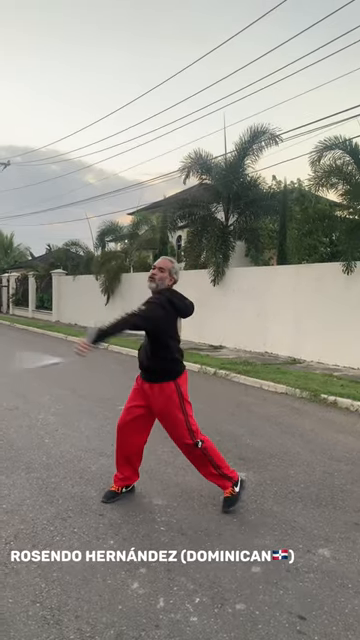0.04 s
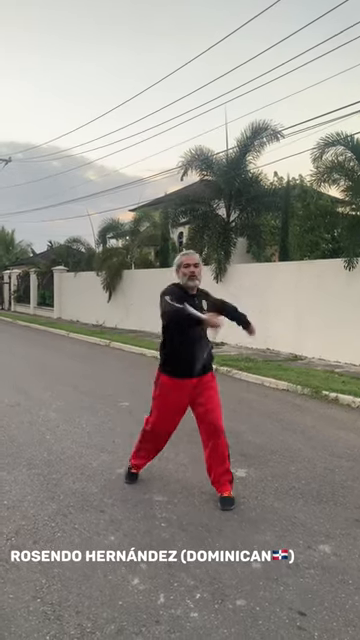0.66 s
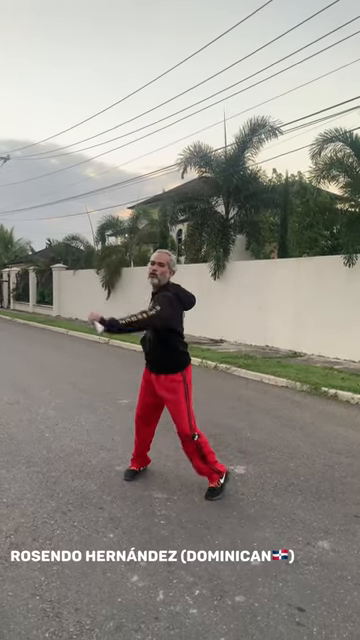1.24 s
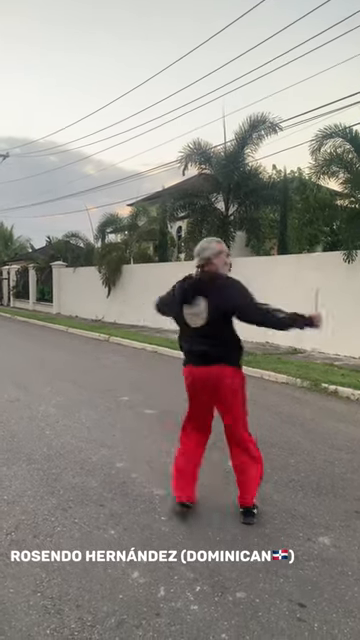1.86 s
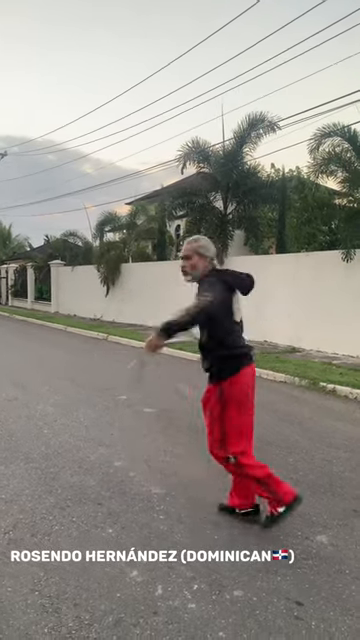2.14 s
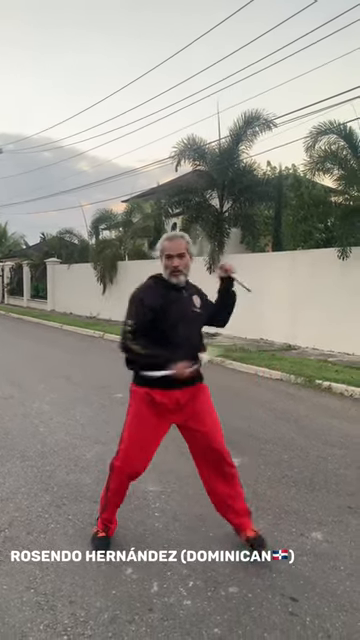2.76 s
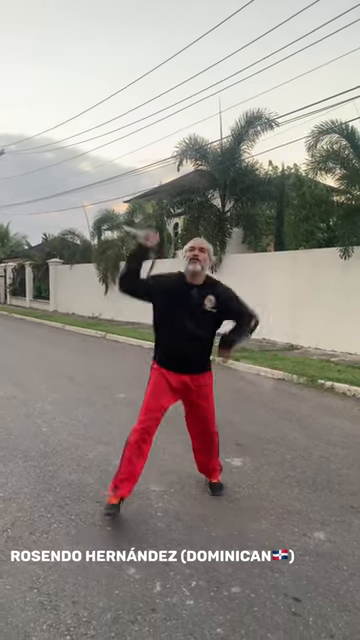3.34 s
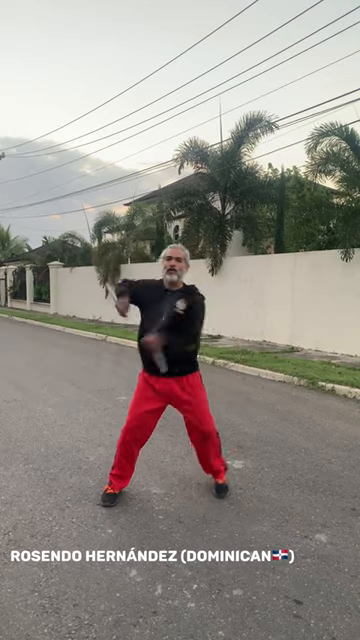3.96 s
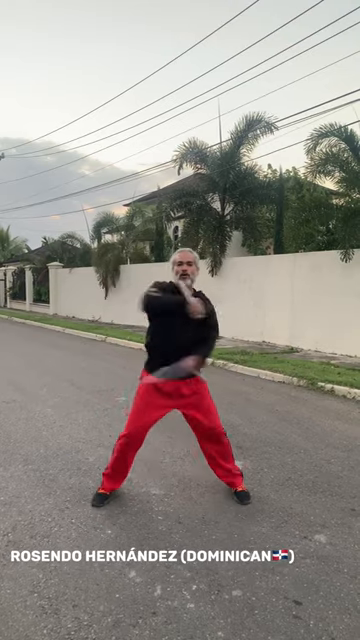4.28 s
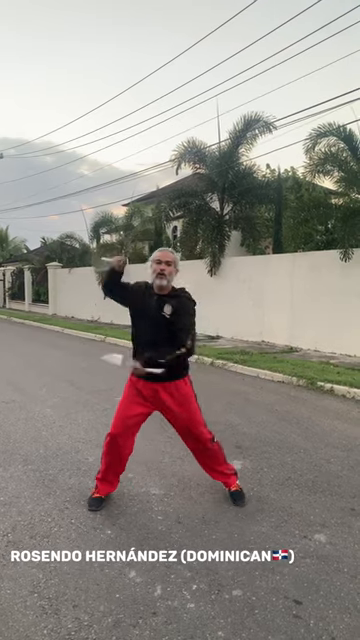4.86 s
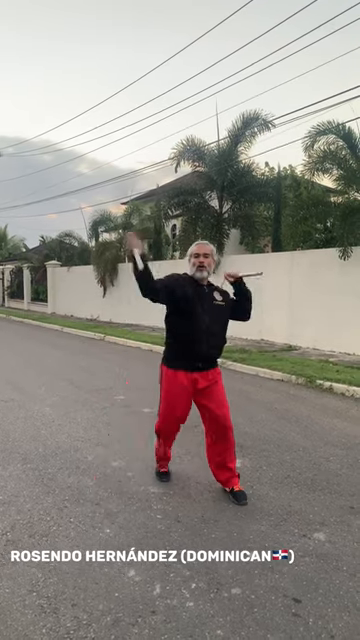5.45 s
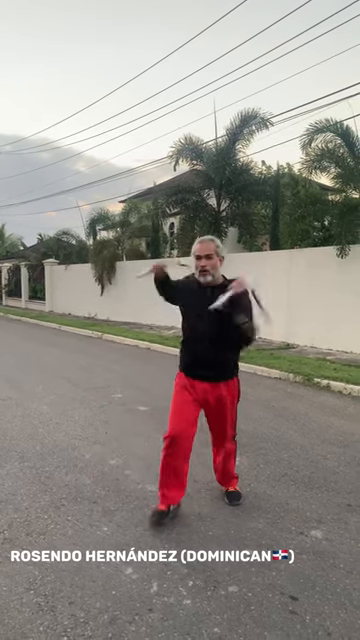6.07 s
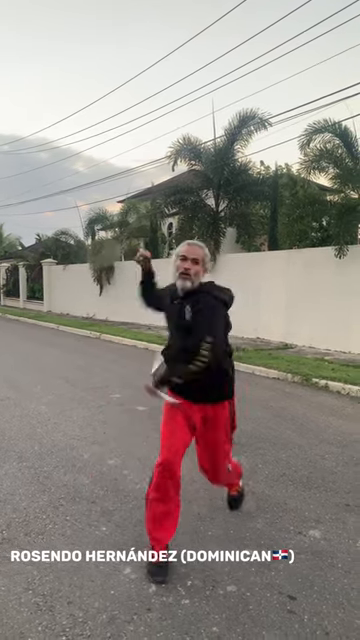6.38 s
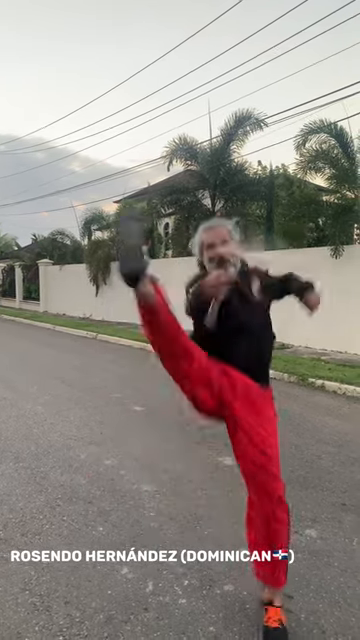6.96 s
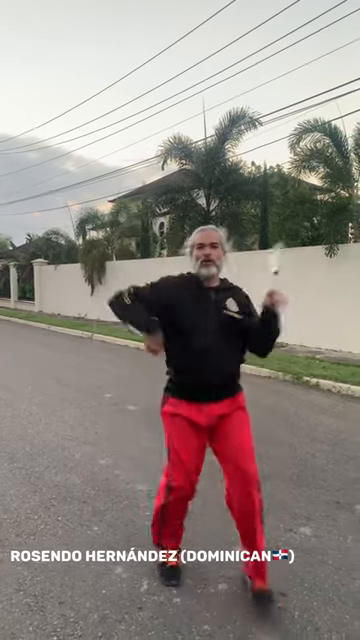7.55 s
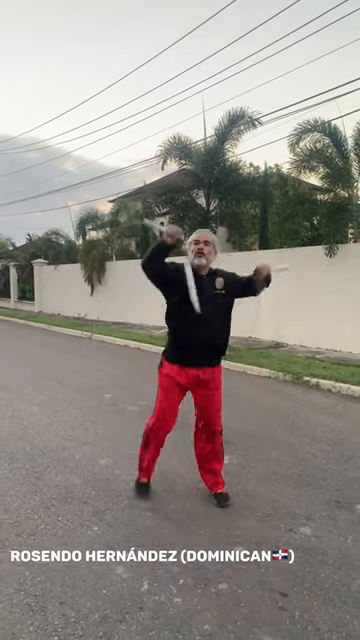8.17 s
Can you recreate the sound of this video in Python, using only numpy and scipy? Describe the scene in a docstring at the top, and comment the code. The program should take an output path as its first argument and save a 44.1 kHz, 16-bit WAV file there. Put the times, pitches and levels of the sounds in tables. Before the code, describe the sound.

Two whirled chained sticks rattle, clink and knock hollowly on a quiet street, with one sharp kick thump near the end.

```python
"""Bright clinks, chain chatter and hollow knocks: two chained sticks whirled on a quiet street.
The loose links rattle with every swing and bunch into a clink when a stick is caught or turned;
taps set the hollow sticks ringing. The moves push soft gusts of air, and a high kick snaps a trouser
leg taut with a crack and a thump. Far off, the town rumbles under a few faint hoots."""
import sys
import numpy as np
from scipy import signal
from scipy.fft import rfft, irfft, next_fast_len
from scipy.io import wavfile

SR = 44100
rng = np.random.default_rng(int(sys.argv[2]) if len(sys.argv) > 2 else 0)


def generate_wav(signal):
    """Clip the signal to [-1, 1] and save it as 16-bit WAV at the path in sys.argv[1]."""
    frames = np.transpose(np.atleast_2d(signal))
    scaled = np.clip(frames, -1, 1) * 32767
    pcm = np.round(scaled).astype(np.int16)
    wavfile.write(sys.argv[1], SR, pcm)


N = 362502
TIME = np.arange(N) / SR

# a stick is caught or turned and the chain jerks taut:
# (time [s], length [s], link clatter [dB], high link ring [dB], stick knock [dB])
CHAIN_JERKS = [(0.166, 0.041, -23.5, -41, -61), (0.259, 0.017, -20, -24, -59),
               (0.391, 0.043, -22, -22, -40), (0.434, 0.0057, -20, -23, -36.5),
               (0.502, 0.012, -22, -32, -39), (0.768, 0.026, -24, -26, -46),
               (0.894, 0.037, -23.5, -44, -49), (0.973, 0.014, -23, -35, -62),
               (1.016, 0.0092, -27.5, -36, -58), (1.194, 0.012, -22, -37, -39),
               (1.312, 0.0049, -19.5, -37, -46), (1.353, 0.039, -16, -31, -31),
               (1.3916, 0.01, -22.0, -25, -44), (1.432, 0.0096, -27, -17, -54),
               (1.464, 0.058, -27.0, -31, -41), (1.555, 0.023, -22, -20, -50),
               (1.6146, 0.018, -25, -35, -51), (1.689, 0.053, -21.5, -25, -56),
               (1.96, 0.03, -19.5, -28.0, -36), (2.021, 0.0083, -22, -25.0, -38),
               (2.144, 0.013, -24.5, -22, -46), (2.328, 0.023, -25, -29, -34.5),
               (2.469, 0.01, -34, -20, -55), (2.705, 0.034, -25, -35, -41), (2.772, 0.07, -24.5, -28, -36),
               (2.867, 0.032, -19, -19, -35), (2.9154, 0.018, -20.5, -28, -35),
               (3.131, 0.031, -20, -37, -45), (3.311, 0.033, -20.5, -22, -44),
               (3.377, 0.029, -21.5, -16.5, -38.5), (3.559, 0.008, -23.5, -38, -31.5),
               (3.593, 0.01, -30, -25, -56), (3.929, 0.019, -25.5, -32, -41),
               (4.304, 0.021, -24.5, -42, -36.5), (4.636, 0.0059, -25, -32.0, -53),
               (4.669, 0.015, -18.5, -30, -29), (4.718, 0.023, -20.5, -25, -39),
               (4.896, 0.017, -25.5, -25, -35), (4.953, 0.0098, -22, -24, -40),
               (4.9763, 0.01, -21, -32, -35), (5.056, 0.017, -24.5, -26, -48),
               (5.098, 0.017, -27, -29, -38.5), (5.32, 0.068, -17.5, -36, -38),
               (5.665, 0.014, -19.5, -35, -36), (5.694, 0.044, -23, -31.0, -45),
               (5.779, 0.022, -22.5, -24, -30.5), (5.981, 0.052, -30, -23, -39),
               (6.079, 0.032, -26, -29, -34.5), (6.167, 0.039, -23.5, -17, -36),
               (6.269, 0.047, -25, -33, -31.5), (6.3446, 0.019, -22.5, -41, -31),
               (6.390, 0.012, -17.5, -16, -34), (6.478, 0.029, -21.5, -32, -31),
               (6.525, 0.017, -23.5, -28, -50), (6.594, 0.012, -22, -39, -40),
               (6.685, 0.04, -26, -16, -33.5), (6.7237, 0.011, -18, -28, -37),
               (6.747, 0.016, -19, -23, -37), (6.788, 0.018, -30, -19, -53), (6.9924, 0.022, -17, -24, -32),
               (7.057, 0.012, -17.5, -26, -26.5), (7.1983, 0.028, -28.5, -13.5, -54),
               (7.458, 0.036, -28, -22, -38), (7.64, 0.012, -27.5, -23, -43),
               (7.679, 0.011, -32, -15.5, -48), (7.761, 0.05, -25.5, -23, -38.5),
               (7.79, 0.011, -27.5, -38, -36), (7.935, 0.01, -26, -23, -41.5),
               (8.008, 0.016, -24.5, -26.0, -36), (8.183, 0.033, -20, -15, -28.5)]
# two links hit each other squarely: (time [s], level [dB])
LINK_SNAPS = [(0.152, -24.5), (.503, -22), (.726, -30), (1.096, -31.5), (1.123, -27), (1.19, -22.5),
              (1.3141, -24.5), (1.391, -30), (1.558, -24.5), (1.9607, -26), (2.3442, -27.5), (2.413, -21),
              (2.5164, -29.5), (2.570, -27.5), (2.8416, -23), (2.862, -28.5), (2.8976, -31),
              (2.9165, -22.5), (2.972, -22.5), (3.1946, -22), (3.218, -25.5), (3.5469, -19), (3.5568, -23),
              (3.588, -20), (3.8047, -20.5), (4.046, -35), (4.1326, -19.5), (4.405, -28), (4.6677, -33),
              (5.312, -23.5), (5.3635, -20), (5.595, -26), (5.8564, -23), (6.144, -24.5), (6.2047, -19.5),
              (6.654, -24), (6.860, -24.5), (7.033, -24), (7.821, -24), (8.182, -20)]
# tone of clattering links, their high ring, a hard snap and a knocked stick: (frequency [Hz], level [dB])
CLATTER_TONE = [(2500, -37), (3800, -14), (5300, 3), (6500, 0), (7400, -2.5), (8400, -1), (9600, 3.5),
                (10400, 3), (12400, -6.5), (16000, -9.5)]
RING_TONE = [(13000, -18), (14200, 14), (15200, 14), (16000, 20)]
SNAP_TONE = [(600, -16.5), (2200, -5), (3800, -5.5), (6500, 6.5), (11000, 6), (16000, 2.5)]
STICK_TONE = [(300, -23), (800, -8.5), (1400, -9.5), (2100, 1.5), (2500, -5), (3400, -3.5), (5000, -9.5)]

SWAY = .045  # share by which the lag between the channels varies as the chain whirls
TUBE_WIDTH_HZ = 90  # bandwidth of a stick's hollow note


def clinks(directions=5, knock_trim_db=-1):
    """Each jerk strikes links and sticks at a new spot, so every clink rings differently."""
    places = np.zeros((directions, N))
    for row, (s, length, clatter_db, ring_db, knock_db) in enumerate(CHAIN_JERKS):
        hits = jerk(length)
        clatter = contact(CLATTER_TONE, t60=.016, tick=.7, mode_count=30)
        ring = contact(RING_TONE, t60=.02, tick=.6, mode_count=8)
        knock = contact(STICK_TONE, t60=.026, tick=.6, mode_count=22)
        for response, db in (clatter, clatter_db), (ring, ring_db), (knock, knock_db + knock_trim_db):
            clink = signal.fftconvolve(hits, response)
            start = s - (len(hits) / 2 + len(response) // 16) / SR
            add(places[row % directions], start, hit_level(clink, db))
    return sum(stereo(x, skew) for x, skew in zip(places, np.linspace(-SWAY, SWAY, directions)))


def snaps(bounce_s=.0045):
    """Link meets link squarely: one hard, broadband blow amid a few quick bounces."""
    places = np.zeros((2, N))
    for row, (s, db) in enumerate(LINK_SNAPS):
        hits = jerk(bounce_s)
        hits[len(hits) // 2] = 1  # as much energy as all the bounces
        snap = strike(hits, contact(SNAP_TONE, t60=.009, tick=.8, mode_count=40))
        add(places[row % 2], s - len(hits) / 2 / SR, hit_level(snap, db))
    return stereo(places[0], -SWAY) + stereo(places[1], SWAY)


def hollow_notes(taps_s=.012):
    """Quick taps near the open end of a stick pile up in its hollow and ring out as a note."""
    # (time [s], pitch [Hz], level [dB])
    notes = [(.175, 2100, -39), (.774, 2050, -36), (.804, 2090, -38), (1.431, 2200, -35),
             (2.412, 2140, -36), (2.902, 2010, -30.5), (3.591, 2020, -33.5), (4.715, 2220, -30.5),
             (5.697, 2110, -36), (6.174, 2070, -36.5), (6.695, 2150, -38), (7.762, 1990, -35)]
    out = np.zeros(N)
    for s, hz, db in notes:
        ring = resonate(jerk(taps_s), hz, TUBE_WIDTH_HZ)
        add_centred(out, s, hit_level(resonate(ring, hz, hz / 2), db))
    return stereo(out)


def loose_links(directions=3, tube_hz=2090, detune=.025):
    """Each swing sets the chain shimmering; single links ping, tick and tap on the hollow sticks."""
    out = 0
    strength = shaking() / np.sqrt(directions)
    for place in np.linspace(-1, 1, directions):
        shimmer = unit(colour(chatter(rate=2500, scatter_db=5, clump_db=8), CLATTER_TONE))
        pings = tinkles(CLATTER_TONE, 5300, 11500, count=380, width_hz=300, scatter_db=10)
        sparkle = tinkles(RING_TONE, 14300, 15700, count=300, width_hz=450, scatter_db=10)
        ticks = tinkles(SNAP_TONE, 5500, 11500, count=50, width_hz=5000, scatter_db=6, length=.003)
        links = undb(-3) * shimmer + undb(-4) * pings + undb(-7) * ticks + undb(-4) * sparkle
        taps = strength * chatter(rate=300, scatter_db=4, clump_db=11, clump_hz=50)
        knocks = strike(taps, contact(STICK_TONE, t60=.02, tick=2, mode_count=40))
        # the hollow note rings on between the taps, a little different at each end
        tube = resonate(taps, tube_hz * (1 + detune * place), TUBE_WIDTH_HZ)
        tube *= np.sqrt(SR / np.pi / TUBE_WIDTH_HZ)  # make-up gain for the narrow band
        out += stereo(strength * links + undb(-18) * knocks + undb(-15) * tube, SWAY * place)
    return out


def shaking(rest_db=-42, settle_db=-16, settle_s=.05, slack_db=-6, slack_lead_s=.015, slack_s=.009):
    """Chatter envelope: the chain swells with a swing, flies slack before a hit, settles after a jerk."""
    # swings of the sticks at their fastest: (time [s], length [s], level [dB])
    swings = [(0.034, 0.16, -35), (0.59, 0.079, -39), (0.77, 0.13, -32.5), (1.096, 0.19, -39),
              (1.624, 0.11, -36), (2.014, 0.066, -30), (2.905, 0.021, -21), (3.09, 0.11, -30),
              (3.595, 0.083, -27.5), (3.813, 0.062, -29), (4.053, 0.1, -33.5), (4.348, 0.13, -34.5),
              (4.611, 0.047, -27), (4.955, 0.042, -24.5), (5.34, 0.14, -30), (5.633, 0.085, -28.5),
              (5.926, 0.12, -30.5), (6.256, 0.15, -28.5), (6.434, 0.055, -32), (6.694, 0.24, -30),
              (7.041, 0.036, -24), (7.236, 0.092, -38), (7.597, 0.11, -31.5), (8.15, 0.36, -33)]
    t = TIME[::64]
    power = undb(rest_db) ** 2
    for s, length, db in swings:
        power += undb(db) ** 2 * np.exp(-2 * ((t - s) / length) ** 2)
    for s, _, db, *_ in CHAIN_JERKS:
        power += (t > s) * undb(db + settle_db) ** 2 * np.exp(-2 * np.abs(t - s) / settle_s)
    slack = sum(np.exp(-((t - s + slack_lead_s) / slack_s) ** 2) for s, *_ in CHAIN_JERKS + LINK_SNAPS)
    return np.interp(TIME, t, np.sqrt(power) * undb(slack_db * np.minimum(slack, 1)))


def jerk(length, rate=2200, scatter_db=4, rise=.25, fall=.56, snap_s=.0026, size=1536):
    """The chain pulls taut: taps build to one snap and die away; the shorter, the harder the snap."""
    t = np.arange(-size, size + 1) / SR / length
    hits = random_taps(len(t), rate) * undb(scatter_db * rng.standard_normal(len(t)))
    hits *= np.exp(-np.abs(t) / np.where(t < 0, rise, fall))
    hits /= np.linalg.norm(hits) + 1e-9
    hits[size] = snap_s / length
    return hits


def chatter(rate, scatter_db, clump_db, clump_hz=75):
    """Loose links tap at random, in small clumps; rms 1."""
    hits = random_taps(N, rate)
    knots = np.arange(0, N / SR, 1 / clump_hz)
    clumps = np.interp(TIME, knots, np.clip(rng.standard_normal(len(knots)), -2, 1))
    scatter = np.clip(rng.standard_normal(N), -2, 2)
    return unit(hits * undb(scatter_db * scatter + clump_db * clumps))


def tinkles(tone, low_hz, high_hz, count, width_hz, scatter_db, length=.009):
    """Single links bounce at random moments, each ringing at its own pitch; rms 1."""
    out = np.zeros(N)
    for when, pitch, force in rng.random((count, 3)):
        grain = resonate(jerk(length, size=400), low_hz + (high_hz - low_hz) * pitch, width_hz)
        add(out, when * N / SR, unit(grain) * undb(scatter_db * force))
    return unit(colour(out, tone))


def contact(tone, t60, tick, mode_count, size=2048):
    """Impulse response of a struck part: a tick plus decaying modes strewn over its range; energy 1."""
    t = (np.arange(size) - size // 16) / SR
    spread = (np.arange(mode_count) + rng.random(mode_count)) / mode_count
    hz = np.interp(spread, [0, 1], [tone[0][0], tone[-1][0]])
    modes = rng.standard_normal(mode_count) @ np.sin(2 * np.pi * hz[:, None] * t)
    ring = modes * (t >= 0) * np.exp(-np.log(1000) * np.abs(t) / t60)
    response = unit(colour(ring, tone)) + tick * unit(colour(t == 0, tone))
    return response / np.linalg.norm(response)


def strike(hits, response):
    """Ring a part with a train of impacts, trimming the response's lead-in."""
    return signal.oaconvolve(hits, response)[len(response) // 16:][:N]


def kick(s=7.0577, attack_s=.0012, hold_s=.0085, release_s=.0038):
    """A wave runs down the trouser leg: a crack diving into a thump, with a rasp of cloth."""
    # a low and a mid ring that colour the kick's thump: (frequency [Hz], width [Hz], level [dB])
    kick_rings = [(385, 50, -9.5), (1190, 130, -3.5)]
    crack_hz, crack_end_hz, crack_s, crack_fall_s = 4290, 1080, .00338, .000977
    thump_hz, thump_fall_s = 380, .0087
    t = np.arange(SR // 16) / SR
    crack_sweep = crack_end_hz + (crack_hz - crack_end_hz) * np.exp(-t / crack_fall_s)
    thump_sweep = thump_hz * np.exp((crack_s - t) / thump_fall_s)
    hz = np.where(t < crack_s, crack_sweep, thump_sweep)
    envelope = np.minimum(t / attack_s, 1) * np.exp(-np.maximum(t - hold_s, 0) / release_s)
    out = np.zeros(N)
    add(out, s, undb(-10.5) * envelope * np.sin(2 * np.pi * np.cumsum(hz) / SR))
    rasp = puff(length=.008, hz=1500, width_hz=1400)
    add_centred(out, s + attack_s, undb(-27) * rasp)
    return stereo(with_resonances(out, kick_rings))


def gusts(length=.07, hz=69.1, width_hz=17):
    """Arms and legs push soft, low gusts of air."""
    # (time [s], level [dB])
    pushes = [(0.372, -33.5), (0.859, -34), (2.23, -29.5), (2.92, -34.5), (3.408, -32.5), (4.569, -35),
              (5.98, -33)]
    return puff_track((s, length, hz, width_hz, db) for s, db in pushes)


def swishes():
    """Cloth, shoes and sticks swish, scuff and slap in the fastest moves: wide bands of noise."""
    # (time [s], length [s], centre [Hz], level [dB])
    moves = [(2.354, 0.042, 920, -46.5), (3.546, 0.028, 2730, -29.5), (4.668, 0.0088, 1490, -29),
             (5.333, 0.059, 2560, -36), (6.291, 0.037, 1100, -41.5), (7.692, 0.086, 125, -33)]
    return puff_track((s, length, hz, hz, db) for s, length, hz, db in moves)


def street_echo(x, t60=.08, wet_db=-6):
    """Thin, scattered echoes off the asphalt and a garden wall, strongest in the mids."""
    mids = colour(x, [(400, -7), (900, 0), (2600, 1), (5500, -10)])
    t = np.arange(SR // 3) / SR
    tails = rng.standard_normal((2, len(t))) * np.exp(-np.log(1000) * t / t60)
    return undb(wet_db) * signal.oaconvolve(mids, tails / np.linalg.norm(tails[0]), axes=1)[:, :N]


def hoots(width_hz=85):
    """Faint far-off hoots: swells of noise narrow enough to have a pitch."""
    # (time [s], length [s], pitch [Hz], level [dB])
    calls = [(.62, 0.1, 850, -45), (1.55, 0.25, 1210, -56), (3.95, 0.13, 820, -47), (4.35, 0.34, 752, -55)]
    return puff_track((s, length, hz, width_hz, db) for s, length, hz, db in calls)


def town(bass_side_db=-10, side_db=-2):
    """Distant rumble and hush, narrow in the bass and wider above."""
    # (frequency [Hz], level [dB])
    rumble_tone = [(20, -31), (35, -12.5), (60, 4), (110, -5.5), (180, -9), (370, -17), (520, -26.5),
                   (800, -25), (2000, -25.5), (3000, -27), (16000, -91)]
    # the bed dips briefly after the kick: (time [s], level [dB])
    fader = [(0, -41.5), (7.03, -41), (7.13, -46.5), (7.28, -45), (7.5, -40), (8.2, -41.5)]
    mid, side = (unit(colour(rng.standard_normal(N), rumble_tone)) for _ in range(2))
    side = colour(side, [(330, bass_side_db), (600, side_db)])
    return np.array([mid + side, mid - side]) * undb(np.interp(TIME, *np.transpose(fader)))


def puff(length, hz, width_hz):
    """A bell-shaped swell of band noise; rms about 1 at its top."""
    t = np.arange(-1.5 * length, 1.5 * length, 1 / SR)
    bell = np.exp(-2 * (t / length) ** 2)
    noise = rng.standard_normal(len(t) + SR // 4)
    band = resonate(resonate(noise, hz, width_hz), hz, width_hz)[-len(t):]
    return unit(band * bell) * np.sqrt(np.mean(bell ** 2))


def puff_track(cues):
    """Lay one puff per cue on a stereo track."""
    out = np.zeros(N)
    for s, length, hz, width_hz, db in cues:
        add_centred(out, s, puff(length, hz, width_hz) * undb(db))
    return stereo(out)


def stereo(x, skew=0):
    """Spread a source over both channels; skew stretches the lag between the microphone ports."""
    # how far the left channel leads: (frequency [Hz], phase [turns])
    left_lead = [(450, 0), (950, -.25), (2000, 0), (3350, 0), (4250, .48), (4900, .52), (6300, 1),
                 (7450, 1), (8450, 1.48), (9200, 1.52), (10600, 2), (11600, 2), (12450, 2.48),
                 (13550, 2.52), (14800, 3)]
    size = next_fast_len(N)
    f = np.fft.rfftfreq(size, 1 / SR)
    turns = np.interp(f * (1 + skew), *np.transpose(left_lead))
    spectrum = rfft(x, size)
    return irfft([spectrum * np.exp(2j * np.pi * turns), spectrum], size)[:, :N]


def random_taps(size, rate):
    """Impulses of random sign, on average rate per second."""
    return (rng.random(size) < rate / SR) * rng.choice([-1, 1], size)


def colour(x, tone):
    """Equalise along a (frequency [Hz], level [dB]) curve."""
    hz, db = np.transpose(tone)
    size = next_fast_len(x.shape[-1])
    f = np.fft.rfftfreq(size, 1 / SR)
    gain = undb(np.interp(np.log(f + 1), np.log(hz), db))
    return irfft(rfft(x, size) * gain, size)[..., :x.shape[-1]]


def resonate(x, hz, width_hz):
    """Two-pole band-pass, gain 1 at the centre."""
    return signal.lfilter(*signal.iirpeak(hz, hz / width_hz, fs=SR), x)


def with_resonances(x, peaks):
    """Blend ringing bands in with the direct sound."""
    return x + sum(undb(db) * resonate(x, hz, width_hz) for hz, width_hz, db in peaks)


def hit_level(x, db, span_s=.01):
    """Give a hit the energy of span_s of steady sound at db."""
    return x * undb(db) * np.sqrt(span_s * SR) / np.linalg.norm(x)


def undb(db):
    """Decibels to gain."""
    return 10 ** (np.asarray(db) / 20)


def unit(x):
    """Scale to rms 1."""
    return x / np.sqrt(np.mean(x ** 2) + 1e-20)


def add(out, s, x):
    """Mix x into out from time s on."""
    i = int(s * SR)
    part = x[max(-i, 0):max(N - i, 0)]
    out[max(i, 0):max(i, 0) + len(part)] += part


def add_centred(out, s, x):
    """Mix x into out with its middle at time s."""
    add(out, s - len(x) / 2 / SR, x)


def scene():
    """Chain, sticks and kick up front with their echo; moving air and the town behind."""
    near = clinks() + snaps() + hollow_notes() + loose_links() + kick()
    return near + street_echo(near) + gusts() + swishes() + hoots() + town()


def record(dry, top_hz=15820):
    """The microphone ports add a few small resonances; the top is cut steeply."""
    # (frequency [Hz], width [Hz], level [dB])
    port_peaks = [(672, 219, 3), (1210, 53, -7), (1730, 230, -7.5)]
    low_pass = signal.ellip(12, .2, 70, top_hz, fs=SR, output="sos")
    return signal.sosfilt(low_pass, with_resonances(dry, port_peaks))


dry = scene()
out = record(dry)
generate_wav(out)
```